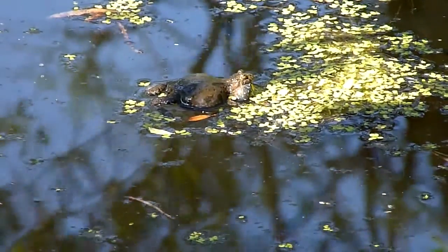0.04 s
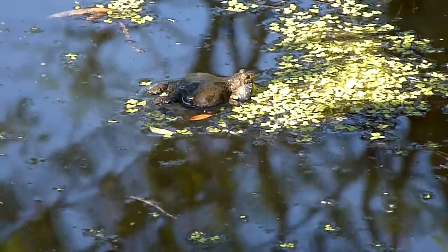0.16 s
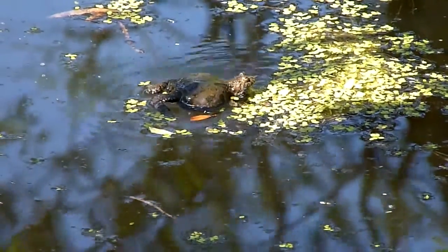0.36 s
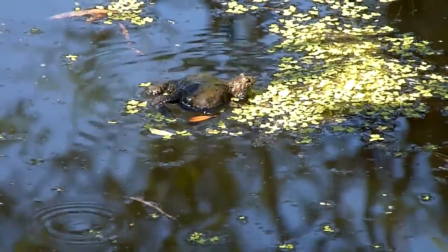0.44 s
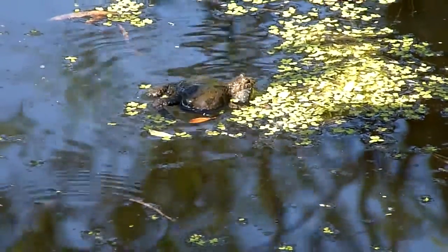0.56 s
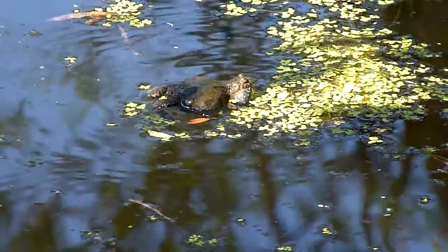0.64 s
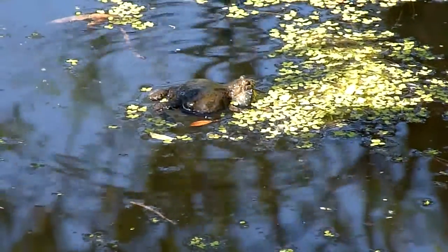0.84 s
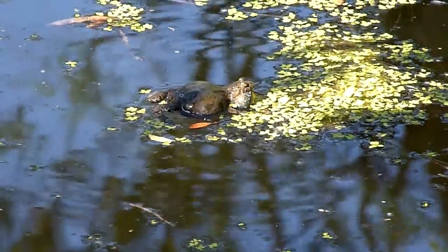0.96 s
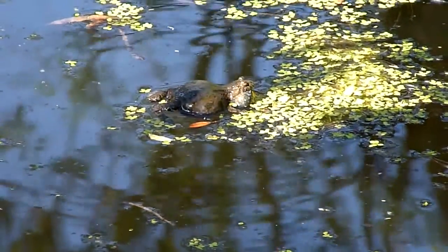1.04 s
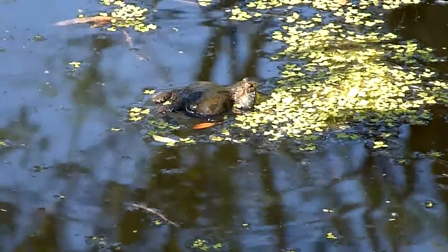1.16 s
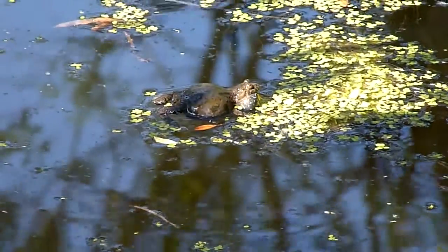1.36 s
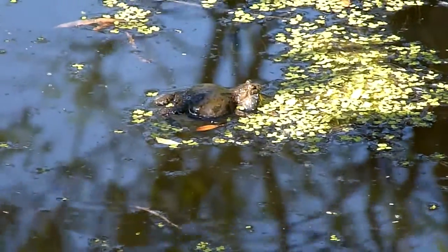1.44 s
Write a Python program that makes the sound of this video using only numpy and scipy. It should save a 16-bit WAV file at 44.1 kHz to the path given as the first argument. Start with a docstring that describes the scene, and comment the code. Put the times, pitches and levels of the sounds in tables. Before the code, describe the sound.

A toad hoots once on a still pond, from about 0.2 to 0.4 seconds: a short, low, nearly pure note, by far the loudest sound. A distant songbird on the right gives four faint whistles between the start and 1.1 seconds. A very faint high trill comes and goes, with three tiny ticks around 0.7 to 1.1 seconds, then soft far low notes. Quiet hum and hiss continue throughout.

```python
"""A songbird's faint whistle opens, to the right among trees, over outdoor hum and microphone hiss.
Then a toad afloat on a still pond hoots once, the loudest sound: its vocal sac passes a nearly pure
note, which the far bank throws back faintly. A small bird trills high up, tiny ticks sound close by,
and soft low notes and a rumble come from far off. The recorder cuts three narrow notches in it all."""
import sys
import numpy as np
from scipy import signal
from scipy.fft import rfft, irfft
from scipy.io import wavfile
from scipy.ndimage import uniform_filter1d, map_coordinates

SR = 44100
rng = np.random.default_rng(int(sys.argv[2]) if len(sys.argv) > 2 else 0)


def int16_out(signal):
    """Quantize to a 16-bit WAV file."""
    q = np.round(np.clip(np.atleast_2d(signal).T, -1, 1) * 32767)
    wavfile.write(sys.argv[1], SR, q.astype(np.int16))


N = 66150
TIME = np.arange(N) / SR
BASS_LEAD_S = 5e-5  # the left microphone port leads in the bass


def undb(db):
    """Logarithmic level: decibels to an amplitude ratio."""
    return 10 ** (np.asarray(db) / 20)


def noise_band(hz, width_hz):
    """Band-limited noise: white noise filtered around hz, rms 1."""
    edges = np.clip([hz - width_hz / 2, hz + width_hz / 2], 5, .45 * SR)
    y = signal.sosfilt(signal.butter(2, edges, "band", fs=SR, output="sos"), rng.standard_normal(N))
    return y / np.sqrt(np.mean(y ** 2))


def wander(rate_hz):
    """Random modulation: held values, smoothed twice, with a spread near 1."""
    hold = int(SR / rate_hz)
    steps = np.repeat(rng.standard_normal(N // hold + 1), hold)
    return 1.3 * uniform_filter1d(uniform_filter1d(steps, hold), hold)[:N]


def delay(x, seconds):
    """Propagation delay, interpolated between samples."""
    return map_coordinates(x, [np.arange(N) - seconds * SR], order=3, mode="constant")


def place(x, pan_db=0, lead_s=0):
    """Localisation by level and time at two ports: positive means left louder and earlier."""
    return np.array([x * undb(pan_db / 2), delay(x, lead_s) * undb(-pan_db / 2)])


def follow(rows, fade_s):
    """Phase as the integral of a pitch curve, with a faded amplitude envelope per level column."""
    times, pitch, *levels = np.array(rows, float).T
    smooth = lambda column: uniform_filter1d(np.interp(TIME, times, column), size=200)
    gate = np.clip(np.minimum(TIME - times[0], times[-1] - TIME) / fade_s, 0, 1)
    phase = 2 * np.pi * np.cumsum(smooth(pitch)) / SR
    return phase, [np.sqrt(2) * gate * undb(smooth(db)) for db in levels]


def glides(rows, settle):
    """Exponential frequency glides under arched envelopes; a larger settle slides earlier."""
    out = 0
    for start, length, from_hz, to_hz, db in rows:
        progress = np.clip((TIME - start) / length, 0, 1)
        hz = from_hz + (to_hz - from_hz) * (1 - np.exp(-settle * progress)) / (1 - np.exp(-settle))
        arch = np.sqrt(2) * undb(db) * np.sqrt(np.abs(np.sin(np.pi * progress)))
        out = out + arch * np.sin(2 * np.pi * np.cumsum(hz) / SR)
    return out


def air():
    """Noise floor of hum and hiss: its third-octave bands swell together and flicker independently."""
    # floor spectrum: (frequency [Hz], relative spectral density [dB])
    density = [(20, -17), (60, -8.5), (150, -9), (240, -3.5), (330, -4), (480, -1), (700, -7.5),
               (1050, -5.5), (1600, -10.5), (2200, -16), (3000, -18.5), (3700, -16.5), (5300, -18),
               (7000, -19.5), (9000, -20.5), (13500, -23.5), (15600, -27)]
    # stereo width: (frequency [Hz], side minus mid [dB])
    width = [(60, -9), (130, -8.5), (300, -13.5), (700, -5.5), (1300, -6), (2400, 1), (4400, 0.5),
             (8000, 1), (15000, 1.5)]
    # stereo balance: (frequency [Hz], left minus right [dB])
    balance = [(60, .5), (400, 0), (2400, -1.5), (15000, -.5)]
    hz = np.maximum(np.arange(N // 2 + 1) * SR / N, 1)
    curve = lambda table: np.interp(np.log(hz), np.log(np.array(table)[:, 0]), np.array(table)[:, 1])
    mid, side = rfft(rng.standard_normal((2, N))) * undb(curve(density))
    side = side * undb(curve(width))
    lag = np.exp(-2j * np.pi * np.minimum(hz, 1200) * BASS_LEAD_S)  # phase lag grows up to 1200 Hz
    tilt = undb(curve(balance) / 2)
    pair = np.array([(mid + side) * tilt, (mid * lag - side) / tilt])
    out, swell_db = 0, .4 * wander(rate_hz=1.6)
    for octave in np.arange(4, 14.4, 1 / 3):
        share = np.clip(1 - 3 * np.abs(np.log2(hz) - octave), 0, 1)
        flicker_db = .8 * wander(rate_hz=12)
        out = out + irfft(pair * share, N) * undb(swell_db + flicker_db)
    return out * undb(-61.5) / np.sqrt(np.mean(out.mean(0) ** 2))


def hum():
    """Narrow-band noise heard as an unsteady drone; a wider band enters late as a far rumble."""
    start_s, rise_s = 1.222, .085
    rise = np.clip((TIME - start_s) / rise_s, 0, 1)
    rumble = rise * undb(-64 + 1.3 * wander(rate_hz=25)) * noise_band(hz=331, width_hz=196)
    drone = undb(-71.5) * noise_band(hz=297.2, width_hz=21)
    return place(rumble + drone, lead_s=BASS_LEAD_S)


def far_notes():
    """Soft, low pure tones far off, each gliding almost linearly in frequency."""
    # far tones: (start [s], length [s], first pitch [Hz], last pitch [Hz], level [dB])
    notes = [(1.11, 0.055, 768, 761, -62.5), (1.11, 0.053, 510, 525, -65), (1.2, 0.057, 770, 731, -65.5),
             (1.34, 0.043, 769, 750, -65), (1.08, 0.097, 304.8, 288, -67.5),
             (1.265, 0.049, 272, 278, -63.5), (1.33, 0.064, 356.3, 345.6, -63), (1.4, 0.022, 345, 377, -59)]
    return place(glides(notes, settle=.34), lead_s=BASS_LEAD_S)


def ticks():
    """Transients close by: tiny dry bursts of noise with exponential decay."""
    # clicks: (time [s], peak level [dB], centre [Hz], bandwidth [Hz], left minus right [dB])
    clicks = [(.7025, -54, 7000, 1800, -8), (.9045, -52, 11500, 4500, 0), (1.067, -57, 7500, 3500, -3)]
    out, decay_s = 0, .0015
    for start, db, hz, width_hz, pan_db in clicks:
        envelope = (TIME >= start) * np.exp(-np.maximum(TIME - start, 0) / decay_s)
        burst = envelope * noise_band(hz, width_hz)
        out = out + place(undb(db) * burst / np.abs(burst).max(), pan_db)
    return out


def trees(x):
    """Reflection and scattering among trees: one clear echo and a diffuse tail for each channel."""
    t60_s, onset_s = .5, .03
    t = np.arange(int(.6 * SR)) / SR
    tail = rng.standard_normal((2, len(t))) * undb(-60 * t / t60_s) * np.clip(t / onset_s, 0, 1)
    tail = tail / np.sqrt(np.sum(tail ** 2, axis=1, keepdims=True))
    diffuse = signal.fftconvolve(x[None], tail, axes=1)[:, :N]
    return undb(-13) * delay(x, seconds=.095) + undb(-5) * diffuse


def small_bird():
    """Fast random amplitude modulation spreads high gliding tones into a husky trill."""
    # trill notes: (start [s], length [s], first pitch [Hz], last pitch [Hz], unmodulated level [dB])
    notes = [(.08, .09, 6250, 5680, -72), (.105, .05, 7450, 7350, -77), (.17, .07, 5400, 4900, -77),
             (.62, .14, 3750, 3650, -78), (.89, .135, 6650, 6850, -75.5), (1.035, .36, 6450, 4990, -74.5),
             (1.06, .03, 7000, 6000, -75), (1.27, .2, 3500, 3350, -80), (1.38, .16, 7000, 7800, -75),
             (1.385, .13, 6650, 6350, -77.5)]
    return glides(notes, settle=2.8) * (.8 + wander(rate_hz=500))


def songbird():
    """Four clear whistles: frequency-modulated pure tones with a random flutter in level."""
    # one contour per whistle: (time [s], pitch [Hz], level before flutter [dB])
    whistles = [
        [(0.015, 1732, -77), (0.031, 1840, -66), (0.079, 1710, -72), (0.089, 1648, -79), (0.11, 1475, -79)],
        [(.3, 1846, -77.5), (.33, 1960, -66.5), (.358, 2111, -60.5), (.375, 2105, -67), (.4, 2202, -63),
         (.425, 2257, -68), (.445, 2252, -67.5), (.468, 2255, -68), (.482, 2066, -70.5), (.497, 1943, -62.5),
         (.51, 1970, -98)],
        [(0.61, 2440, -79), (0.622, 2422, -71.5), (0.682, 2492, -60), (0.706, 2386, -66.5), (0.754, 2300, -61),
         (0.81, 2219, -65), (0.828, 2105, -60.5), (0.84, 2200, -100)],
        [(0.93, 1610, -72), (0.968, 1596, -73), (0.976, 1674, -77), (1.004, 1675, -70.5), (1.05, 1727, -66.5),
         (1.075, 1552, -67)],
    ]
    song, flutter_db = 0, 2.5
    for whistle in whistles:
        phase, (envelope,) = follow(whistle, fade_s=.008)
        song = song + envelope * np.sin(phase)
    return song * undb(flutter_db * wander(rate_hz=60))


def far_bank(x):
    """Reflection from the pond's bank: two faint, delayed copies."""
    # echo paths: (delay [s], gain [dB])
    echoes = [(.125, -32), (.19, -47)]
    return sum(undb(db) * delay(x, seconds) for seconds, db in echoes)


def toad():
    """Acoustic filtering: the vocal sac passes the fundamental and only traces of the harmonics."""
    # hoot contour: (time [s], pitch [Hz], fundamental [dB], 2nd harmonic [dB], 3rd harmonic [dB])
    contour = [(.205, 556, -67, -66, -71), (.211, 555, -43, -52, -68), (.217, 552, -34, -48, -65),
               (.225, 548, -29, -48, -68), (.24, 544, -25.5, -50, -63), (.257, 538.5, -23, -50, -65),
               (.272, 536, -23, -51, -65), (.292, 535.5, -20.5, -50, -68), (.312, 533.5, -22.5, -48.5, -73),
               (.328, 534, -21.5, -50, -64), (.345, 532.5, -21.5, -51, -63), (.365, 534, -24, -50, -62),
               (.385, 536.5, -27.5, -56, -64), (.4, 539, -32, -61, -70), (.412, 540, -38.5, -74, -78),
               (.422, 538, -47.5, -85, -88), (.432, 536, -64, -90, -92)]
    # faint noise bands: (centre [Hz], bandwidth [Hz], level re the fundamental's peak [dB])
    bands = [(625, 78, -40), (1366, 630, -45.5)]
    phase, (first, second, third) = follow(contour, fade_s=.003)
    harmonics = [first, second, third, undb(-50) * first]
    tone = sum(envelope * np.sin(k * phase) for k, envelope in enumerate(harmonics, 1))
    noise = sum(undb(db) * noise_band(hz, width_hz) for hz, width_hz, db in bands)
    # the noise swells and fades with the hoot, roughening it slightly
    return tone + first ** 2 / first.max() * noise


def scene():
    """Superposition of the toad and the birds, their reflections and the background."""
    hoot, song, trill = toad(), songbird(), small_bird()
    pond = place(hoot + far_bank(hoot), pan_db=.5, lead_s=3.7e-5)
    birds = place(song, pan_db=-7, lead_s=3e-5) + place(trill, pan_db=-3) + trees(song + trill)
    return pond + birds + far_notes() + ticks() + air() + hum()


def record(dry):
    """Band-stop filtering in the recorder: three narrow notches, passed twice, then a steep low-pass."""
    # stop bands: (centre [Hz], bandwidth [Hz], gain per pass [dB])
    notches = [(2601, 300, -12), (4613, 480, -26), (7930, 220, -18)]
    cutoff_hz = 15650
    for hz, width_hz, db in notches + notches:
        tuning = -2 * np.cos(2 * np.pi * hz / SR)
        width = np.tan(np.pi * width_hz / SR)
        numerator = [1 + width * undb(db), tuning, 1 - width * undb(db)]
        dry = signal.lfilter(numerator, [1 + width, tuning, 1 - width], dry)
    return signal.sosfilt(signal.ellip(12, .2, 80, cutoff_hz, fs=SR, output="sos"), dry)


dry = scene()
out = record(dry)
int16_out(out)
```